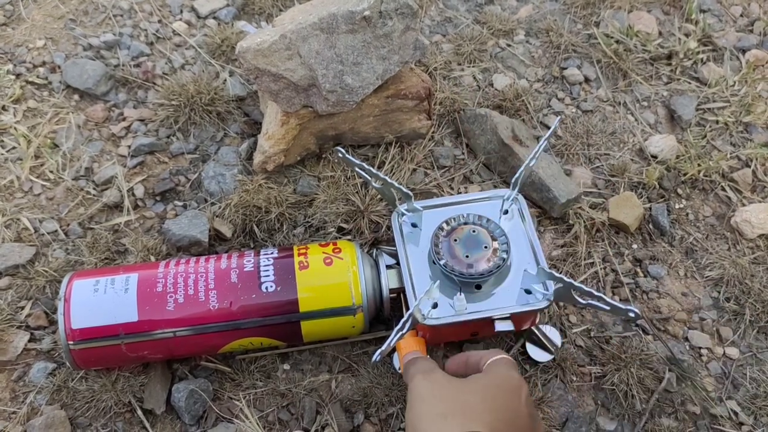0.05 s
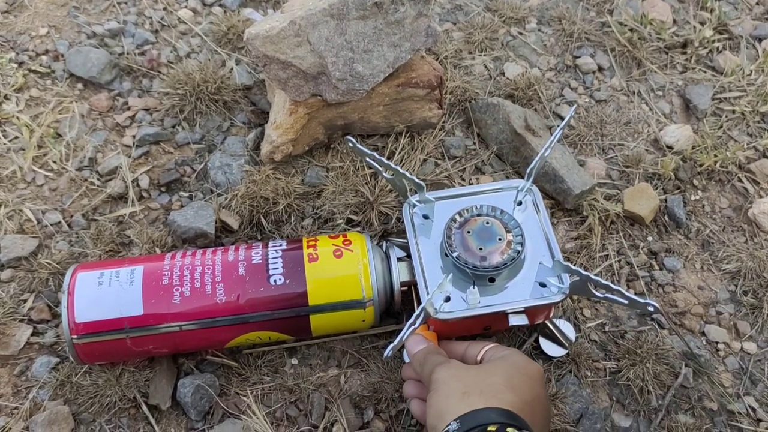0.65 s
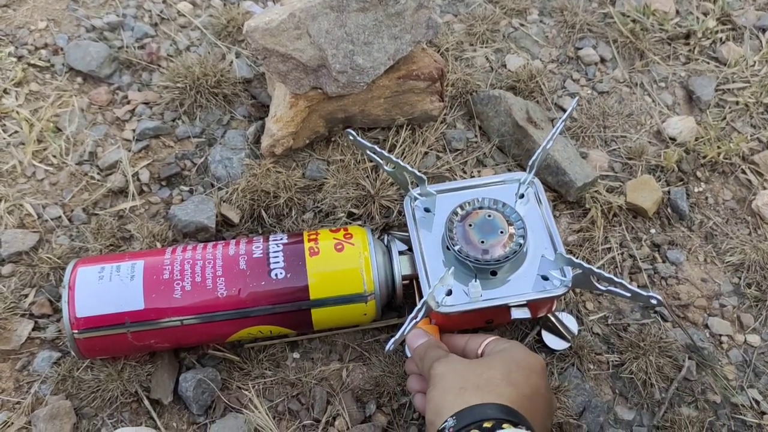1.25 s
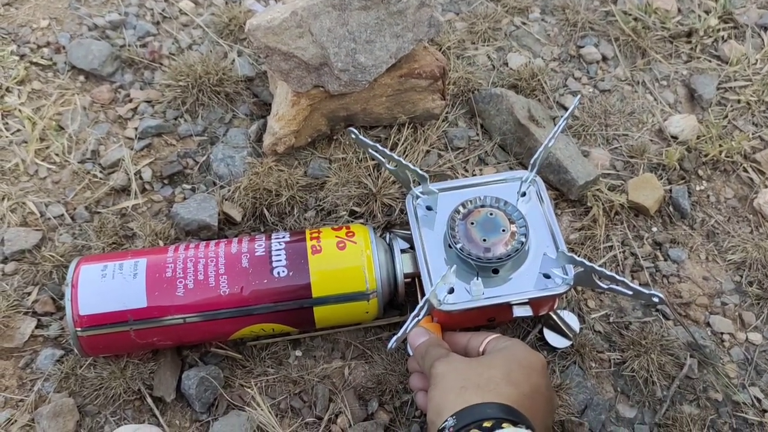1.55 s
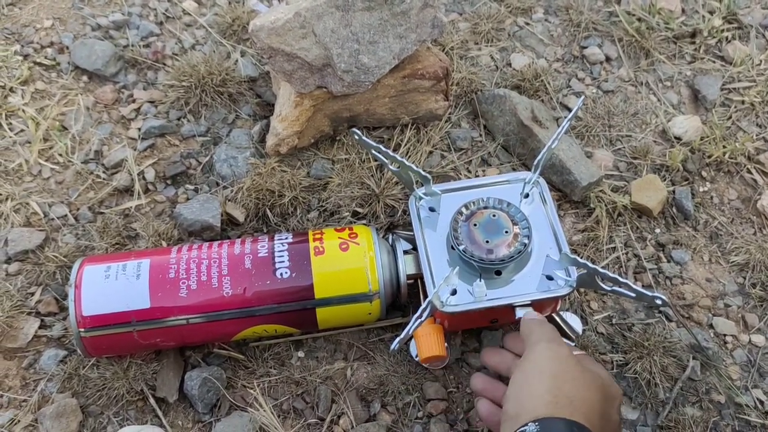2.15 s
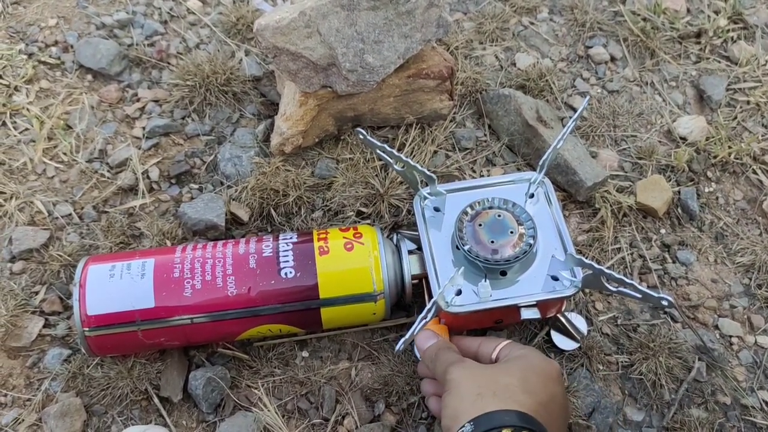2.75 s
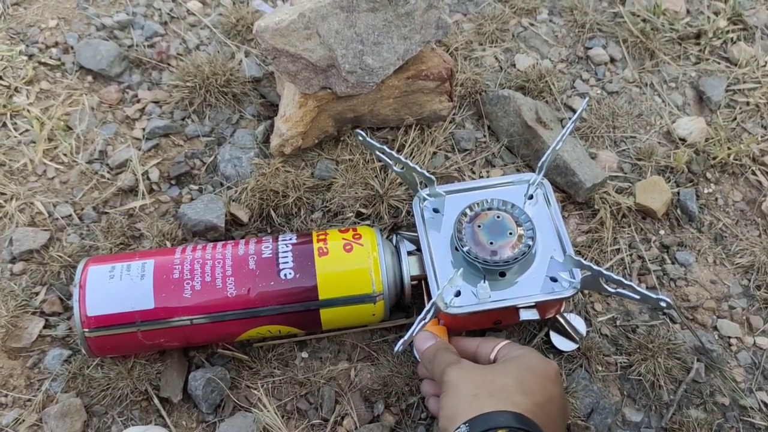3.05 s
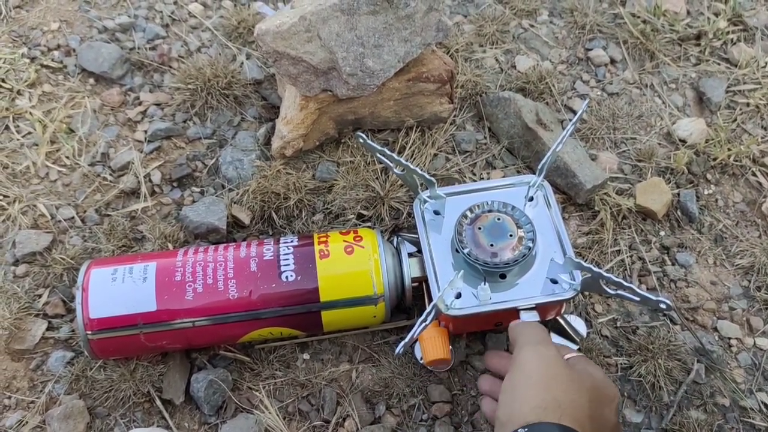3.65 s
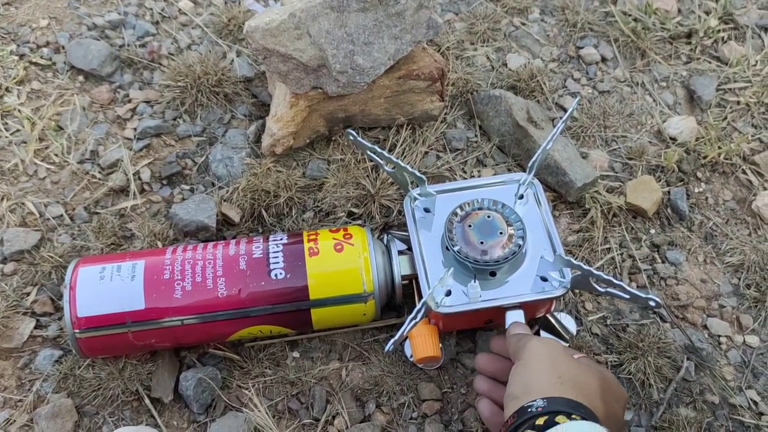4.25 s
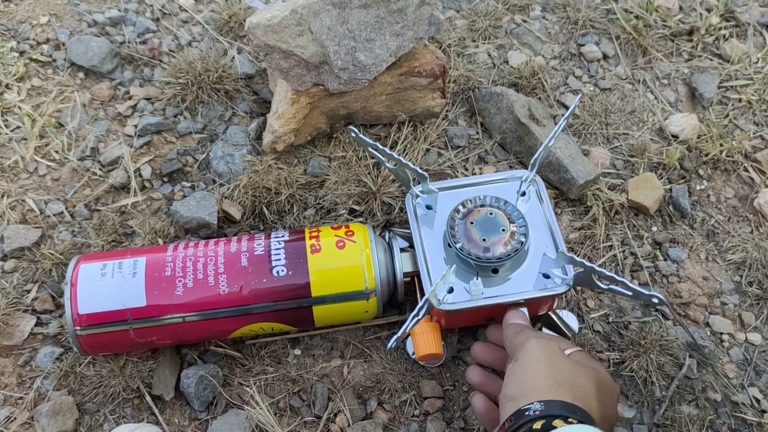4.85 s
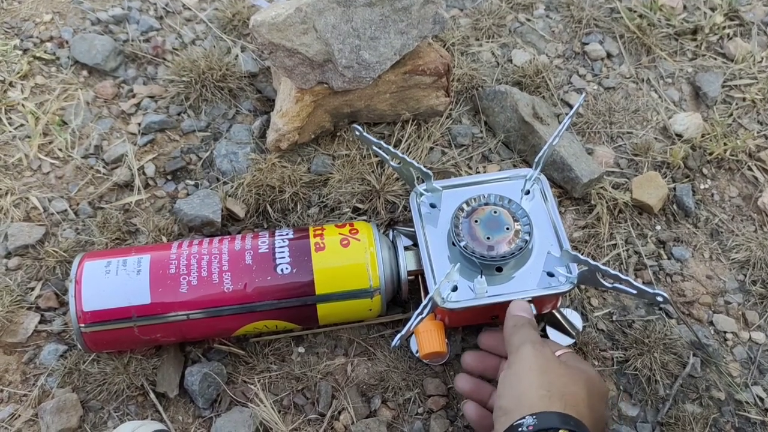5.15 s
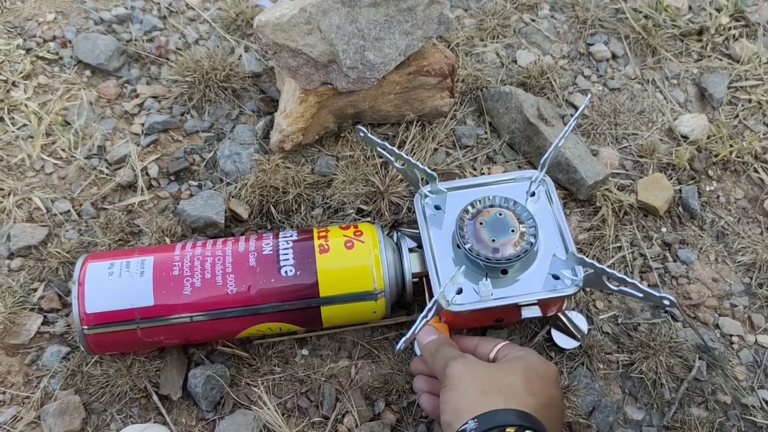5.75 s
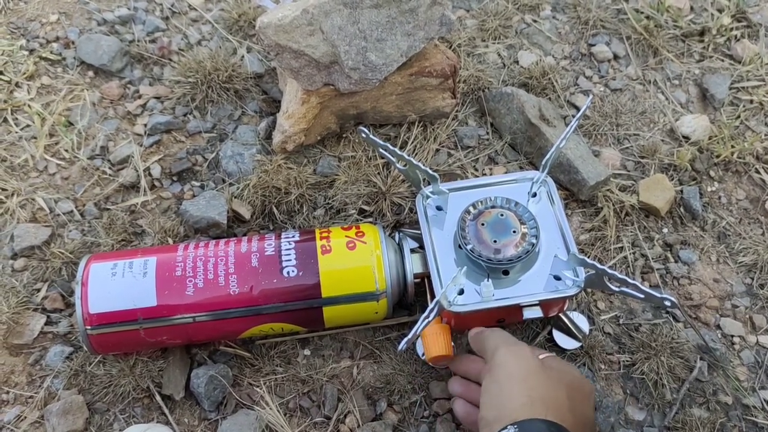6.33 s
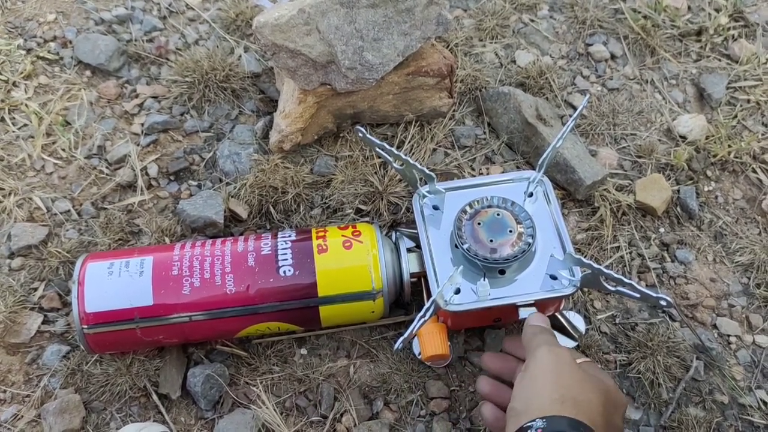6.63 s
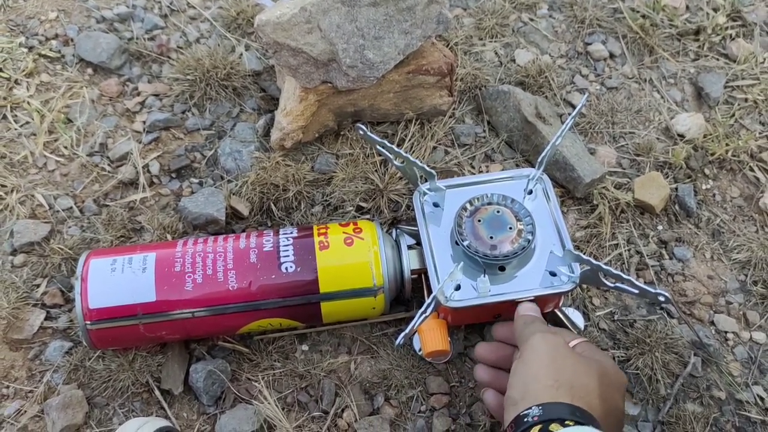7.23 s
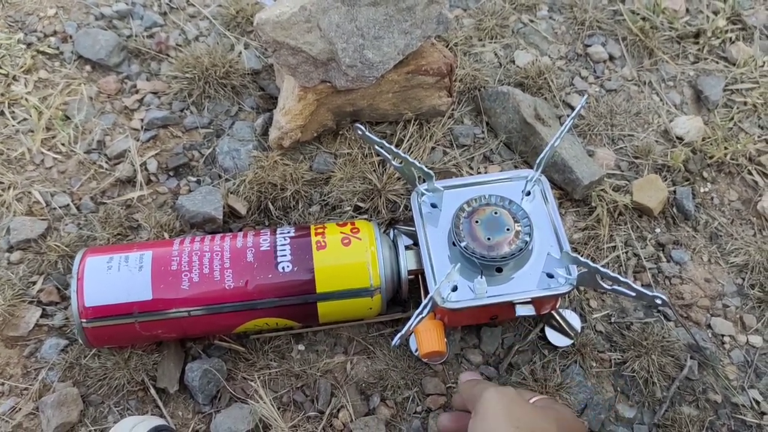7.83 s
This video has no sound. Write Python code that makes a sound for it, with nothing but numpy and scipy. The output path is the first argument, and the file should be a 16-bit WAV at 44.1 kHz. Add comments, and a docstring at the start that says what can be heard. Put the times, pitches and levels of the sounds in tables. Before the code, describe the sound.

A camping gas stove is lit outdoors, close to the microphone. It shifts softly on grit and gas hisses faintly, on and off. The igniter snaps twice, ringing the steel, its button clicking back each time. The hiss returns, the valve knob scrapes, and two more snaps follow. The last lights a low, fluttering flame. Small birds chirp over a distant rumble and faint engine drone.

```python
"""A camping gas stove is lit outdoors, close by: its piezo igniter snaps four times, ringing the steel.
The button springs back after each snap. A hand works the valve and gas hisses through the burner tube;
the last spark lights a fluttering flame. The knob scrapes and the stove shifts on grit.
Small birds chirp over a distant rumble and engine drone. A limiter ducks everything after each snap."""
import sys
import numpy as np
from scipy import signal
from scipy.fft import rfft, irfft, next_fast_len
from scipy.io import wavfile
from scipy.ndimage import uniform_filter1d, minimum_filter1d

SR = 44100
rng = np.random.default_rng(int(sys.argv[2]) if len(sys.argv) > 2 else 0)


def file_out(sig):
    """Save sig as 16-bit WAV at sys.argv[1]."""
    # one column per channel
    cols = np.atleast_2d(sig).T
    # limit, then scale
    lim = np.clip(cols, -1, 1)
    pcm = np.round(lim * 32767).astype(np.int16)
    wavfile.write(sys.argv[1], SR, pcm)


N = 347949
TIME_S = np.arange(N) / SR
RING_TIME_S = np.arange(SR * 3 // 5) / SR

# stereo likeness of the stove: (frequency [Hz], left-right correlation [-])
STOVE_CORRELATION = [(100, 1), (2500, 0.81), (4500, 0.63), (7000, 0.73), (15000, 0.72)]
# button returns: (let-go time [s], slide [s], relative stop level [dB], treble [dB], ring [dB])
RELEASES = [(4.7834, .0215, -23.5, -23.5, -11.5), (5.315, 0.00194, -18.5, -19, -10),
            (7.3499, .032, -34, -18.5, -11), (7.7703, 0.015, -16.5, -15, -12.5)]


def igniter(sheet, travel_s=.0005, pulse_hz=1580, pulse_s=.00026, spring_hz=967.5, spring_t60_s=.88):
    """A spring hammer strikes the stove; the spring sings until the finger eases off the button."""
    # hammer blows: (time [s], relative level [dB], treble [half dB], left-right [dB], ring [dB])
    snaps = [(4.452, -7, -14, -2, -14), (5.0494, -8.5, -11, 2, -12.5), (7.062, -7.5, -18, 1, -16),
             (7.5398, -6.5, -17.5, 1, -16.5)]
    # modes of steel body, pot arms and can: (frequency [Hz], level [dB], t60 [s])
    stove_modes = [(860, -24, 0.71), (1187, -27, 1.53), (1246, -17, 0.58), (1295, -0.5, 0.055),
                   (1309, 7.5, 0.037), (1347, -17, 0.31), (1480, -39, 1.3), (1797, 11, 0.031),
                   (1934, -10, 0.43), (2000, -15.5, 0.48), (1999, 6, 0.036), (2210, -20, 0.49),
                   (2467, 10.5, 0.034), (2580, -30, 1.33), (2810, -28, 0.74), (2935, -0.5, 0.059),
                   (3164, -16, 0.66), (3290, 2.5, 0.072), (3497, -28, 0.52), (4200, -13, 0.017),
                   (4340, -33, 0.69), (4497, -0.5, 0.068), (4430, -32, 0.49), (5750, -19, 0.18),
                   (6500, -9, 0.092), (6820, -30, 0.39), (8240, -30, 0.5), (9270, -6, 0.067),
                   (9900, -28, .25), (14100, -24, 0.095)]
    # uneven beaming to the two channels: (frequency [Hz], left-right [dB])
    beaming = [(100, -6.5), (3000, 1.5), (6000, 7.5), (8500, -1), (11800, -10), (13000, 21), (15500, -4)]
    out, t = np.zeros((2, N)), RING_TIME_S
    pulse = amp(2.5) * t / pulse_s * np.exp(1 - t / pulse_s) * np.sin(2 * np.pi * pulse_hz * t)
    pulse = signal.sosfilt(signal.butter(4, 930, "high", fs=SR, output="sos"), pulse)
    for (s, db, treble_db, pan_db, ring_db), (let_go_s, *_) in zip(snaps, RELEASES):
        ease_off_s = let_go_s - .021
        damping_db = 600 * np.maximum(s + t - ease_off_s, 0)
        spring = amp(-26 - 60 * t / spring_t60_s - damping_db) * np.sin(2 * np.pi * spring_hz * t)
        steel = blow(sheet, stove_modes, ring_db, crack_t60_s=.03, shimmer_db=-19.5, contact_db=-4)
        snap = pulse + steel + spring
        left = colour(snap[:1], lambda hz: .5 * lookup(beaming, hz))
        right = colour(snap[1:], lambda hz: -.5 * lookup(beaming, hz))
        snap = treble_shelf(np.vstack([left, right]), .5 * (treble_db + 15))
        add(out, s + travel_s, amp(db + np.array([[.5], [-.5]]) * pan_db) * snap)
    return out


def blow(sheet, modes, ring_db, crack_t60_s, shimmer_db, contact_db, contact_s=.00092, rise_s=.0007):
    """One impact on steel: contact spike, short crack, sheet shimmer and the struck part's ring."""
    # dense fast modes of the crack: (frequency [Hz], level [dB])
    crack_spectrum = [(30, -40), (120, 2), (300, -9.5), (600, -15), (900, -17), (1500, -1), (3300, 4),
                      (4800, -8.5), (6000, -4), (8300, 1), (9800, -7), (11500, -3), (12800, -2.5),
                      (15000, -4), (16400, -18)]
    t = RING_TIME_S
    decay = amp(-60 * t / crack_t60_s) + amp(contact_db) * np.exp(-t / contact_s)
    impact = noise(len(t), crack_spectrum, STOVE_CORRELATION) * decay
    hz, phasors = sheet
    a, b = rng.standard_normal((2, len(hz))) + 1j * rng.standard_normal((2, len(hz)))
    excitation = stereo_pair(a, b, STOVE_CORRELATION, hz)
    shimmer = (excitation @ phasors).real / np.linalg.norm(phasors[:, 0])
    add(impact, 0, amp(shimmer_db) * shimmer)
    return impact * np.minimum(t / rise_s, 1) + amp(ring_db) * ring(modes)


def ring(modes, max_lag_s=.00004, twin_gain=.53, split=.00727, baffle_hz=1000):
    """Nearly symmetric steel rings in beating mode pairs; small parts radiate little bass."""
    t = RING_TIME_S
    out = np.zeros((2, len(t)))
    for (hz, db, t60_s), (lag, jitter_db, detune) in zip(modes, rng.standard_normal((len(modes), 3))):
        phase = 2 * np.pi * hz * (t + np.tanh(lag) * max_lag_s * np.array([[1], [-1]]))
        pair = np.sin(phase) + twin_gain * np.sin(phase * (1 + split * detune))
        out += amp(db + jitter_db - 60 * t / t60_s) * pair
    return signal.sosfilt(signal.butter(5, baffle_hz, "high", fs=SR, output="sos"), out)


def sheet_modes(count=220, lowest_hz=800, span_hz=14700):
    """The thin sheet's many weak modes: frequencies and decaying phasors."""
    # sheet shimmer: (frequency [Hz], level [dB])
    spectrum = [(800, 1.5), (1200, -2.5), (2000, 6.5), (3300, 7), (5000, 2), (8300, 6), (10000, -7),
                (15000, -10)]
    # sheet damping: (frequency [Hz], t60 [s])
    decay_times = [(500, 0.62), (2000, 0.38), (4000, 0.17), (8000, 0.12), (15000, 0.19)]
    hz = lowest_hz + (np.arange(count) + rng.random(count)) * span_hz / count
    t = np.arange(SR // 3) / SR
    poles = 2j * np.pi * hz - np.log(1000) / lookup(decay_times, hz)
    return hz, amp(lookup(spectrum, hz))[:, None] * np.exp(poles[:, None] * t)


def button(sheet, gain_db=-10, travel_s=.0006):
    """The button lets go with a dull knock and clicks at its stop; a finger adds light taps."""
    # modes of button and bracket: (frequency [Hz], level [dB], t60 [s])
    bracket_modes = [(1298, 9, 0.074), (1327, -11, 0.62), (1824, -6, 0.45), (1930, 8.5, 0.078),
                     (2170, -12, 0.45), (2440, -7, 0.27), (2870, -4, 0.043), (3160, -24, 0.27),
                     (3450, -1, 0.03), (4380, -12.5, 0.32), (6200, -2, .08), (6830, 10, 0.066),
                     (8300, -8, 0.11), (8400, 3, 0.15), (10700, -19, 0.17), (14600, 3, 0.051)]
    # finger taps: (time [s], relative level [dB], treble [dB], ring [dB])
    taps = [(0.017, -23, -35, -22), (7.205, -28, -23, -15.5)]
    out, knocks = np.zeros((2, N)), list(taps)
    let_go_db = (-25, -35, -15)  # level, treble, ring
    for s, slide_s, *stop_db in RELEASES:
        knocks += [(s, *let_go_db), (s + slide_s, *stop_db)]
    for s, db, treble_db, ring_db in knocks:
        knock = blow(sheet, bracket_modes, ring_db,
                     crack_t60_s=.056, shimmer_db=-12, contact_db=8, rise_s=.0022)
        add(out, s + travel_s, amp(db + gain_db) * treble_shelf(knock, treble_db + 18))
    return out


def flame(lit_s=7.57, catch_s=.045, hold_s=.045, settle_s=.26, steady_s=7.9, pop_hz=140, pop_s=.00074):
    """Fire runs round the burner, gathered gas flares with irregular pops, then a low roar settles."""
    cycles = np.cumsum(pop_hz * np.exp(.27 * drift(N, rate_hz=130))) / SR
    impulses = np.diff(np.floor(cycles), prepend=0) * np.exp(.54 * drift(N, rate_hz=200))
    u = np.arange(-256, 256) / SR / pop_s
    pops = unit_rms(signal.oaconvolve(impulses, u * np.exp(-u ** 2 / 2), "same"))
    age_s = np.maximum(TIME_S - lit_s, 0)
    flutter = (age_s > catch_s) * np.exp(-(age_s - catch_s) / settle_s)
    flare = amp(-35 - 76 * np.maximum(age_s - catch_s - hold_s, 0))
    steady = amp(-40.5 - 75 * np.maximum(steady_s - TIME_S, 0))
    envelope = np.minimum(age_s / catch_s, 1) * np.hypot(flare, steady)
    # flame roar: (frequency [Hz], level [dB])
    roar_spectrum = [(30, -37), (80, -2.5), (140, 4.5), (320, 3.5), (460, 0), (650, -21), (1500, -22),
                     (5000, -50)]
    return envelope * (amp(2) * flutter * pops + noise(N, roar_spectrum, STOVE_CORRELATION))


def gas(gain_db=4, first_leak_db=-24, closing_db_per_s=220):
    """Jet noise resonates in the burner tube, swelling as the valve opens and dying fast as it shuts."""
    # valve turns: (open time [s], time constant [s], shut time [s], relative full flow [dB])
    valve_turns = [(.95, 0.16, 1.76, -71), (1.62, 0.071, 2.06, -64), (2.7, .33, 3.6, -62),
                   (5.63, 0.22, 8, -59)]
    # burner tube resonances: (frequency [Hz], width [Hz], level [dB])
    tube_modes = [(2500, 96, 4), (3225, 200, -1.5), (5410, 112, 1), (7760, 370, -7), (10500, 700, -16.5),
                  (13700, 3000, -20)]

    def tube_db(hz):
        power = sum(amp(2 * db) / (1 + ((hz - f) / width) ** 2) ** 2 for f, width, db in tube_modes)
        return 10 * np.log10(power)

    flow = np.zeros(N)
    for open_s, tau_s, shut_s, db in valve_turns:
        opening_db = first_leak_db * np.exp(-np.maximum(TIME_S - open_s, 0) / tau_s)
        closing_db = closing_db_per_s * np.maximum(TIME_S - shut_s, 0)
        flow += (TIME_S > open_s) * amp(db + opening_db - closing_db)
    return amp(gain_db) * flow * unit_rms(colour(rng.standard_normal((2, N)), tube_db))


def rubs(grain=.16):
    """Grainy friction of the valve knob and button in their seats."""
    # scrapes: (time [s], length [s], level [dB], tilt [dB/octave])
    scrapes = [(0.846, 0.0091, -45.5, -11), (4.928, 0.055, -51.5, -2), (6.298, .04, -37.5, 0),
               (6.238, 0.23, -53, 2.5), (6.445, 0.048, -45.5, 0)]
    # friction noise: (frequency [Hz], level [dB])
    spectrum = [(100, -27), (600, -16), (850, -3.5), (1600, -1), (2450, 5), (3350, -2), (3900, -13),
                (5000, -14), (5450, -1), (6000, -19), (7700, -12), (9300, -25), (10500, -10.5),
                (15000, -19)]
    out = np.zeros((2, N))
    for s, length_s, db, tilt_db in scrapes:
        n = int(length_s * SR)
        slips = noise(n, spectrum, STOVE_CORRELATION) * np.exp(grain * drift(n, rate_hz=790))
        slips = colour(slips, lambda hz: tilt_db * np.log2(np.maximum(hz, 400) / 2000))
        add(out, s, amp(db) * unit_rms(slips) * signal.windows.tukey(n, .7))
    return out


def scuffs(grain=.18):
    """Grit crunches softly under the stove's feet."""
    # stove shifting under the hand: (time [s], length [s], level [dB])
    shifts = [(-0.08, 0.3, -51), (0.28, 0.28, -59), (2.185, 0.095, -60), (2.585, 0.15, -63),
              (3.527, .17, -54), (3.967, 0.054, -57), (6.818, 0.12, -57)]
    # grit noise: (frequency [Hz], level [dB])
    spectrum = [(100, -13), (350, 8), (600, 6), (950, -1.5), (2400, -3.5), (4000, -8.5), (7500, -8),
                (10000, -16), (15000, -21)]
    out = np.zeros((2, N))
    for s, length_s, db in shifts:
        n = int(length_s * SR)
        crunch = noise(n, spectrum, STOVE_CORRELATION) * np.exp(grain * drift(n, rate_hz=300))
        add(out, s, amp(db) * unit_rms(crunch) * signal.windows.tukey(n, .7))
    return out


def birds(gain_db=-2, wet_db=-2, echo_t60_s=.3, chatter_hz=2160, chatter_gap_s=.11):
    """Phrases of lead-in, whistle and raspy falling note amid loose chatter, blurred by trees."""
    # song: (time [s], lead-in [Hz], whistle top [Hz], relative level [dB],
    #        fall delay [s], fall start [Hz], relative fall level [dB])
    phrases = [(.545, 2520, 3070, -57.5, 0.12, 2310, -60), (1.478, 2420, 2830, -49, 0.2, 2500, -48.5),
               (1.562, 3970, 4440, -56, 0.18, 2190, -54), (2.322, 2150, 2984, -51.5, 0.12, 2240, -53),
               (2.747, 2170, 2930, -53, 0.24, 2250, -49.5), (3.135, 2180, 3160, -52.5, 0.25, 2250, -52),
               (4.16, 2090, 2760, -47, .105, 2400, -55), (6.635, 2000, 2550, -55, 0.23, 2190, -48)]
    # soft chatter: (start [s], end [s], relative level [dB])
    chatter = [(0.868, 1.15, -59), (2.023, 2.23, -56), (2.869, 3.38, -54), (3.883, 4.38, -57),
               (6.75, 7.05, -53)]
    song = np.zeros((2, N))
    for s, lead_hz, top_hz, db, delay_s, fall_hz, fall_db in phrases:
        add(song, s, amp(db - 2) * bird_note(.042, lead_hz, lead_hz + 160, waver=.025, rasp=.55))
        whistle = bird_note(.0537, (lead_hz + top_hz) / 2, top_hz, waver=.014, rasp=.45)
        add(song, s + .026, amp(db) * whistle)
        fall = bird_note(.0363, fall_hz, fall_hz - 340, waver=.025, rasp=.65)
        add(song, s + delay_s, amp(fall_db) * fall)
    for start_s, end_s, db in chatter:
        for s in np.arange(start_s, end_s, chatter_gap_s):
            first_hz, last_hz = chatter_hz * np.exp(.095 * rng.standard_normal(2))
            onset_s = s + rng.random() * chatter_gap_s / 2
            add(song, onset_s, amp(db) * bird_note(.0418, first_hz, last_hz, waver=.04, rasp=.87))
    t = np.arange(SR // 2) / SR
    trees = rng.standard_normal((2, len(t))) * amp(-60 * t / echo_t60_s)
    echo = signal.fftconvolve(song, trees / np.linalg.norm(trees[0]), axes=1)[:, :N]
    return amp(gain_db) * (song + amp(wet_db) * echo)


def bird_note(length_s, first_hz, last_hz, waver, rasp):
    """A glide that levels off, wavering in pitch and strength."""
    n = int(length_s * SR)
    hz = first_hz + (last_hz - first_hz) * np.sin(np.linspace(0, np.pi / 2, n))
    cycles = np.cumsum(hz * (1 + waver * drift(n, rate_hz=610))) / SR
    strength = unit_rms(1 + rasp * drift(n, rate_hz=398))
    return strength * np.sin(2 * np.pi * cycles) * signal.windows.hann(n) ** .5


def far_engine(fundamental_hz=69.44, waver_db=3.9):
    """A distant engine drones on three wavering harmonics."""
    cycles = np.cumsum(fundamental_hz * (1 + .00693 * drift(N, rate_hz=6))) / SR
    return sum(amp(db + waver_db * drift(N, rate_hz=9.9)) * np.sin(2 * np.pi * harmonic * cycles)
               for harmonic, db in [(2, -67), (3, -61), (4, -65.5)])


def outdoor_air(level_db=-50, swell_db=.96, rumble_hz=400):
    """A low swelling rumble under a faint steady hiss."""
    # ambient noise: (frequency [Hz], level [dB])
    spectrum = [(15, -68), (25, -43), (66, -4.5), (96, 1), (209, -6), (245, -10), (281, -6), (321, -12.5),
                (801, -18), (1490, -20.5), (2110, -20.5), (2540, -21.5), (2760, -23.5), (3610, -27),
                (15400, -34), (16000, -70)]
    # its stereo likeness: (frequency [Hz], left-right correlation [-])
    correlation = [(60, 0.98), (200, 0.8), (380, 0.47), (700, 0.0017), (2400, 0.19), (8000, 0.032)]
    air = noise(N, spectrum, correlation)
    rumble = signal.sosfiltfilt(signal.butter(2, rumble_hz, fs=SR, output="sos"), air)
    hiss = air - rumble
    return amp(level_db) * (hiss + amp(swell_db * drift(N, rate_hz=8.2)) * rumble)


def amp(db):
    """Decibels to gain."""
    return 10 ** (np.asarray(db) / 20)


def unit_rms(x):
    """Scales to rms 1."""
    return x / np.sqrt(np.mean(x ** 2) + 1e-20)


def lookup(points, hz):
    """Interpolates a table on a log-frequency axis."""
    f, value = np.transpose(points)
    return np.interp(np.log(hz + 1), np.log(f + 1), value)


def add(mix, s, sound):
    """Mixes a sound in at time s."""
    at = round(s * SR)
    sound = sound[..., max(-at, 0):]
    part = mix[:, max(at, 0):][:, :sound.shape[-1]]
    part += sound[..., :part.shape[1]]


def colour(x, db_at, size=2048):
    """Minimum-phase filter with gain db_at(Hz)."""
    hz = abs(np.fft.fftfreq(size, 1 / SR))
    log_gain = np.log(amp(np.maximum(db_at(hz), -100)))
    taps = np.fft.ifft(np.exp(np.conj(signal.hilbert(log_gain)))).real
    return signal.oaconvolve(x, taps[None, :size // 2], axes=1)[:, :x.shape[1]]


def treble_shelf(x, db, corner_hz=4500):
    """Lifts or lowers everything above the corner."""
    return colour(x, lambda hz: db * hz ** 4 / (hz ** 4 + corner_hz ** 4))


def stereo_pair(a, b, correlation, hz):
    """Blends two independent spectra into partly correlated left and right."""
    c = np.clip(lookup(correlation, hz), -1, 1)
    return np.array([a, c * a + np.sqrt(1 - c ** 2) * b])


def noise(n, spectrum, correlation):
    """Stereo noise of given spectrum and left-right correlation."""
    size = next_fast_len(n)
    hz = np.fft.rfftfreq(size, 1 / SR)
    a, b = rfft(rng.standard_normal((2, size)))
    shaped = stereo_pair(a, b, correlation, hz) * amp(lookup(spectrum, hz))
    return unit_rms(irfft(shaped, size)[:, :n])


def drift(n, rate_hz):
    """Straight lines between random knots."""
    knots = rng.standard_normal(int(n / SR * rate_hz) + 3)
    return np.interp(np.arange(n) / SR * rate_hz, np.arange(len(knots)), knots)


def scene():
    """The stove in its surroundings."""
    sheet = sheet_modes()
    stove = igniter(sheet) + button(sheet) + rubs() + scuffs() + gas() + flame()
    return stove + far_engine() + outdoor_air() + birds()


def record(dry, ceiling_db=-9.5, recovery_db_per_s=14, cutoff_hz=16400):
    """Look-ahead limiter with slow recovery, then clipping and a low-pass."""
    power_db = 10 * np.log10(abs(uniform_filter1d((dry ** 2).mean(0), size=88)) + 1e-12)
    recovery_db = TIME_S * recovery_db_per_s
    held_db = np.maximum.accumulate(power_db + recovery_db) - recovery_db
    over_db = np.maximum(held_db - ceiling_db, 0)
    gain_db = uniform_filter1d(minimum_filter1d(-over_db, size=300), size=150)
    limited = np.clip(dry * amp(gain_db), -1, 1)
    low_pass = signal.firwin(301, cutoff_hz, window=("kaiser", 8), fs=SR)
    return signal.oaconvolve(limited, low_pass[None], "same")


dry = scene()
out = record(dry)
file_out(out)
```